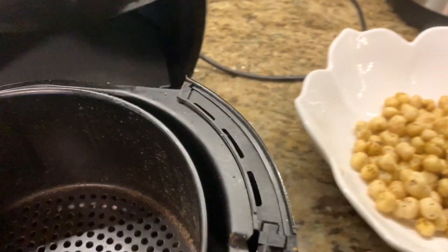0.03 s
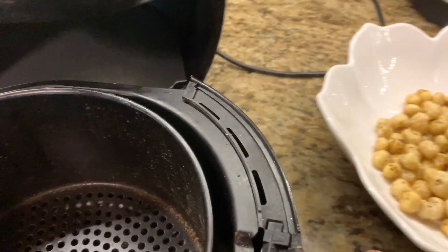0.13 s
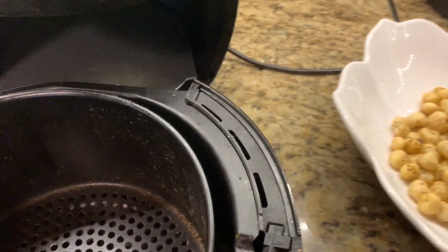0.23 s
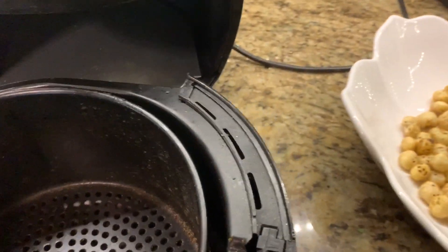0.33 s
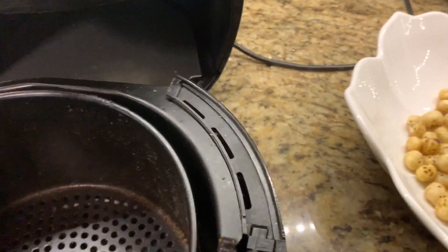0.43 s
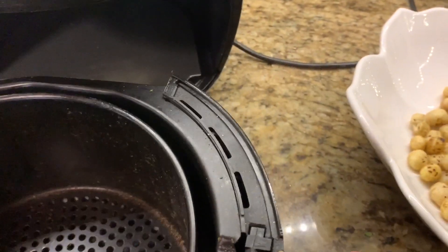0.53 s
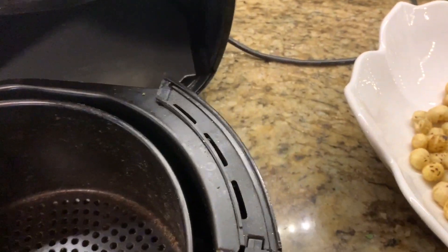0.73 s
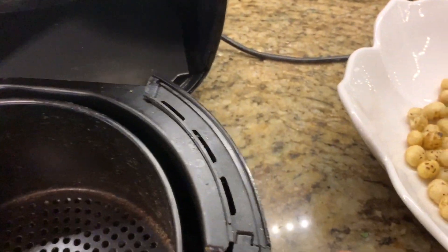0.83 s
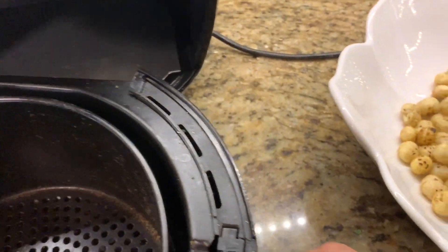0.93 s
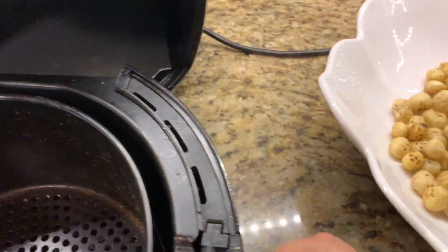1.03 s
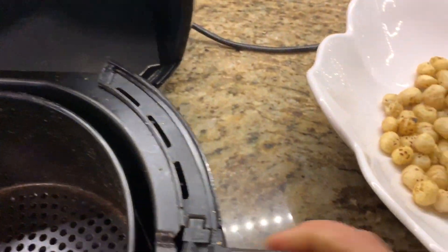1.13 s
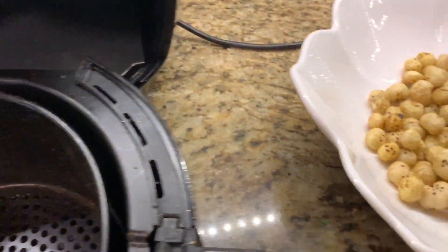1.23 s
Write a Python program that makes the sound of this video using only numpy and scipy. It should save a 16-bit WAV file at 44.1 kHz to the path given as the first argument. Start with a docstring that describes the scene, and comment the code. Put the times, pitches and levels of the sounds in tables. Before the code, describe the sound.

Two quick, hollow knocks with a metallic rattle sound as an air fryer drawer meets a kitchen counter. Light rubbing, bumps and tiny clicks come after, with soft clockwork ticking, a steady low hum and a little room echo.

```python
"""A low hum fills a small kitchen, and an air fryer's clockwork timer ticks softly throughout.
The fryer's plastic drawer is knocked twice on the stone counter: the hollow drawer booms, and the
metal basket inside rattles briefly each time. The drawer then slides a little with a faint hiss,
and light scuffs, dull bumps, two tiny clicks and a shorter slide follow as it is handled. All but the
hum echo in the room; knocks, rattles, slides, bumps and ticks reach the left just before the right."""
import sys
import numpy as np
from scipy import signal
from scipy.fft import irfft, next_fast_len
from scipy.io import wavfile
from scipy.ndimage import map_coordinates

SR = 44100
rng = np.random.default_rng(int(sys.argv[2]) if len(sys.argv) > 2 else 0)


def bounce(signal):
    """Save signal as a 16-bit WAV file at the path given by the first command-line argument."""
    frames = np.transpose(np.atleast_2d(signal))
    limited = np.clip(frames, -1, 1)
    pcm = np.round(limited * 32767).astype(np.int16)
    wavfile.write(sys.argv[1], SR, pcm)


N = 57330
RIGHT_LAG_S, DRAWER_PAN_DB, BASKET_PAN_DB = .00027, 3, -0.5
CONTACT_SPREAD, CLACK_RISE_S = 0.86, 0.00057


def gain(db):
    """Turn decibels into a number to multiply by."""
    return 10 ** (np.asarray(db) / 20)


def noise(colour, spread=0.6):
    """Stereo noise shaped by (pitch_hz, level_db) rows; at spread 0 the sides match, at 1 they don't."""
    hz, db = np.array(colour).T
    size = next_fast_len(N)
    bins_hz = np.fft.rfftfreq(size, 1 / SR)
    strength = gain(np.interp(np.log(bins_hz + 1), np.log(hz), db))
    phases = np.exp(2j * np.pi * rng.random((2, len(strength))))
    mid, side = irfft(strength * phases, size)[:, :N]
    pair = np.array([mid + spread * side, mid - spread * side])
    return pair / pair.std()


def fade(start, rise, decay):
    """Loudness that swells, then dies away by 60 dB every `decay` seconds."""
    age = np.maximum(np.arange(N) / SR - start, 0)
    return (1 - np.exp(-age / rise)) * np.exp(-np.log(1000) * age / decay)


def ring(tones, start, rise, pitch_ratio):
    """One blow sets off fading tones, each with its pitch multiplied by pitch_ratio."""
    age = np.arange(N) / SR - start
    return -sum(gain(db) * fade(start, rise, decay) * np.sin(2 * np.pi * hz * pitch_ratio * age)
                for hz, db, decay in tones)


def wander(rate_hz):
    """A smooth random drift, mostly between -1 and 1."""
    points = rng.standard_normal(2048)
    return map_coordinates(points, [np.arange(N) / SR * rate_hz], mode="mirror")


def place(sound, pan_db, lag_s=RIGHT_LAG_S):
    """Make the left side louder by pan_db and the right side later by lag_s."""
    left, right = np.broadcast_to(sound, (2, N))
    late_right = np.pad(right, (round(lag_s * SR), 0))[:N]
    return np.array([left * gain(pan_db / 2), late_right * gain(-pan_db / 2)])


# colour of the rumble: pitch_hz, level_db
RUMBLE_COLOUR = [(8, -62), (22, -29), (34, -10), (55, 4), (80, -3.5), (140, -5), (200, -17.5), (300, -20.5),
                 (450, -26), (700, -36.5), (1100, -42.5), (2000, -52), (4000, -48), (16000, -66)]


def hum():
    """An appliance's low rumble, a 60 Hz tone from the power line and a trace of hiss."""
    rumble = gain(-48.5) * noise(RUMBLE_COLOUR, spread=.25)
    mains = gain(-50.5) * np.sqrt(2) * np.sin(2 * np.pi * 60 * np.arange(N) / SR)
    hiss = gain(-84) * noise([(300, -28), (4000, -2), (15000, -25.5)])
    return rumble + mains + hiss


# colour of the room's echo: pitch_hz, level_db
ECHO_COLOUR = [(100, -8.5), (250, -1.5), (450, -1), (1000, 0.5), (2500, -8.5), (7000, -4), (14000, 0.5)]


def kitchen_echo(sound):
    """The hard walls of a small room blur each sound into a fading tail."""
    tail = noise(ECHO_COLOUR) * fade(0, rise=0.0044, decay=0.73)
    tail = tail / np.sqrt(np.sum(tail ** 2) / 2)
    return gain(-14.5) * signal.fftconvolve(sound, tail, axes=1)[:, :N]


# slides of the drawer: start_s, length_s, level_db
SLIDE_MOVES = [(0.449, 0.13, -60), (1.03, 0.043, -67)]
# colour of their hiss: pitch_hz, level_db
SLIDE_COLOUR = [(700, 0), (1600, 0), (2300, -5), (4200, 0), (5300, -5), (7600, -2), (9800, -14),
                (11300, -10), (13500, -12), (15000, -28)]


def slide():
    """The drawer rubs over the counter with a faint, grainy hiss."""
    t = np.arange(N) / SR
    edge_s = .012
    motion = sum(gain(db) * np.clip(np.minimum(t - start, start + length - t) / edge_s + .5, 0, 1)
                 for start, length, db in SLIDE_MOVES)
    grain = gain(2 * wander(rate_hz=400))
    return place(motion * grain * noise(SLIDE_COLOUR, CONTACT_SPREAD), BASKET_PAN_DB)


# colour of a snap: pitch_hz, level_db
SNAP_COLOUR = [(1000, 1), (4000, -1.5), (8000, -4), (11000, -6), (15000, -8.5), (16000, -23)]


def snap(loudness):
    """The bright noise of a sharp contact, used for plastic clicks and basket clacks."""
    return loudness * noise(SNAP_COLOUR, CONTACT_SPREAD)


# light touches: start_s, level_db, rise_s, decay_s
SCUFF_TOUCHES = [(0.155, -54.5, 0.00051, 0.33), (0.58, -43.5, 0.0097, 0.059), (0.605, -62, 0.00044, 0.073),
                 (0.663, -52, 0.0019, 0.083), (0.754, -57.5, 0.00076, 0.087), (0.773, -60.5, 0.0008, 0.043),
                 (1.029, -57.5, 0.0025, 0.34), (1.057, -53, 0.011, 0.078)]
# their colour: pitch_hz, level_db
SCUFF_COLOUR = [(200, 2), (700, 10), (1100, 3), (1600, 3), (2600, -2), (4500, -1.5), (7000, -18),
                (14000, -19)]
# tiny clicks of plastic: start_s, level_db
PLASTIC_CLICKS = [(0.7535, -71), (1.0105, -56)]
# dull bumps: start_s, level_db, pitch_ratio
BUMP_HITS = [(0.643, -33, 1.0), (0.757, -48.5, 1.9), (1.067, -55, 3.4)]
# tones of a bump: base_pitch_hz, level_db, decay_s
BUMP_TONES = [(68.9, 0, 0.18), (152.4, -3.5, 0.17), (212.3, 3.5, 0.081), (256.9, -4, 0.15)]


def handling():
    """Handling the drawer makes faint scuffs, clicks of plastic and soft, dull bumps."""
    touches = sum(gain(db) * fade(start, rise, decay) for start, db, rise, decay in SCUFF_TOUCHES)
    scuffs = touches * noise(SCUFF_COLOUR, CONTACT_SPREAD)
    clicks = snap(sum(gain(db) * fade(start, CLACK_RISE_S, decay=0.02) for start, db in PLASTIC_CLICKS))
    bumps = sum(gain(db) * ring(BUMP_TONES, start, rise=0.0021, pitch_ratio=ratio)
                for start, db, ratio in BUMP_HITS)
    return scuffs + clicks + place(bumps, DRAWER_PAN_DB)


# ticks of the timer: start_s, level_db, pan_db, pitch_ratio
TIMER_TICKS = [(-0.002, -2.5, -0.5, 0.97), (0.4375, 1, 1, 0.94), (0.6597, -5, 1, 1.04),
               (0.8798, -1, 0.5, 0.98), (1.1015, -5.5, 0.5, 1.03)]
# colour of a tick: pitch_hz, level_db
TICK_COLOUR = [(600, -2.5), (2200, -11.5), (3000, 3.5), (3700, 3.5), (5400, -9), (6800, -2), (8300, -8.5),
               (10000, -3), (12000, -15.5), (14200, 0.5), (16000, -27)]
# tones of the clockwork: base_pitch_hz, level_db, decay_s
CLOCKWORK_TONES = [(2850, -58, .04), (3400, -53, .06), (3660, -44, .06), (4560, -54, .07), (5250, -57, .05),
                   (6500, -58, .07), (9600, -55, .045)]
# lingering tone of the spring: base_pitch_hz, level_db, decay_s
SPRING_TONE = [(3790, -68, .7)]


def timer():
    """The catch that paces the clockwork clicks, and the gears, case and spring ring briefly."""
    rise = 0.0017
    ticks = 0
    for start, db, pan_db, ratio in TIMER_TICKS:
        click = gain(-40) * fade(start, rise, decay=0.021)
        case = gain(-49.5) * fade(start, rise, decay=0.13)
        burst = (click + case) * noise(TICK_COLOUR, spread=0.87)
        gears = ring(CLOCKWORK_TONES, start, rise, ratio)
        spring = ring(SPRING_TONE, start, rise, pitch_ratio=0.98)
        ticks = ticks + gain(db) * place(burst + gears + spring, pan_db)
    return ticks


# the basket hits the drawer: start_s, ring_db, crack_db, snap_db
BASKET_CLACKS = [(0.218, -20, 5.5, 0), (0.2222, 1, -2, -7), (0.2275, -3, -2.5, -9), (0.240, 2.5, -10, -15),
                 (0.2425, -5.5, 1, -2.5), (0.2485, -26, -18, -11), (0.3352, -35, 1, -7.5),
                 (0.3364, -3, 0.5, -26), (0.3585, -3, -10, -24), (0.3655, -18, -7.5, -18),
                 (0.375, -36, -12.5, -31)]
# tones of the metal basket: pitch_hz, level_db, decay_s
BASKET_TONES = [(1035, -40, .18), (1085, -40, .16), (1373, -52, .55), (1681, -29, .18), (1730, -32, .22),
                (1829, -31, .2), (1948, -28, .12), (2532, -37, .24), (2574, -32, .22), (3325, -42, .16),
                (3410, -42, .14), (3830, -40, .14), (4163, -43, .18), (4456, -44, .15), (4848, -43, .13),
                (5520, -49, .15), (6010, -53, .24), (7330, -47, .12), (7850, -57, .3)]
# colour of a clack's crack: pitch_hz, level_db
CRACK_COLOUR = [(300, 8), (800, 13.5), (1400, -3), (1900, 9), (2900, -12.5), (3400, 8.5), (4800, -6),
                (6000, -8), (7400, -2), (9000, -22.5), (10000, -5.5), (11000, -44), (13500, -21),
                (16000, -46)]


def basket():
    """The basket rattles in its drawer: each clack snaps, cracks and leaves thin metal ringing."""
    starts, ring_db, crack_db, snap_db = np.array(BASKET_CLACKS).T

    def loudness(levels_db, decay):
        """Add up the fading energy of all the clacks."""
        return np.sqrt(sum((gain(db) * fade(start, CLACK_RISE_S, decay)) ** 2
                           for start, db in zip(starts, levels_db)))

    t = np.arange(N) / SR
    metal = 0
    for hz, db, decay in BASKET_TONES:
        wavering_tone = np.sin(2 * np.pi * hz * t + .7 * wander(rate_hz=70))
        metal = metal + gain(db) * loudness(ring_db, decay) * wavering_tone
    cracks = gain(-28) * loudness(crack_db, decay=0.11) * noise(CRACK_COLOUR, CONTACT_SPREAD)
    snaps = snap(gain(-30.5) * loudness(snap_db, decay=0.024))
    return place(metal + cracks + snaps, BASKET_PAN_DB, lag_s=.00022)


# the drawer hits the counter, twice per knock: start_s, level_db, pitch_ratio
DRAWER_HITS = [(0.2215, -1.7, 1.0), (0.2439, -20, 0.988), (0.3385, -6.1, 0.976), (0.3685, -13.2, 0.981)]
# tones of the plastic drawer: base_pitch_hz, level_db, decay_s
DRAWER_TONES = [(93, -21.0, 0.225), (141, -33.8, 0.575), (202, -12.4, 0.063), (254, -4.2, 0.182),
                (245, -17.0, 0.443), (291, -28.7, 0.039), (349, -14.9, 0.101), (385, -11.7, 0.131),
                (431, -4.7, 0.051), (471, -17.9, 0.172), (571, -22.8, 0.085), (703, -20.2, 0.057),
                (788, -34.7, 0.353), (896, -31.6, 0.108)]


def drawer():
    """The hollow drawer booms each time it meets the stone counter."""
    booms = sum(gain(db) * ring(DRAWER_TONES, start, rise=.002, pitch_ratio=ratio)
                for start, db, ratio in DRAWER_HITS)
    return place(booms, DRAWER_PAN_DB)


def scene():
    """The fryer's sounds and their echo, over the hum."""
    fryer = drawer() + basket() + slide() + timer() + handling()
    return fryer + kitchen_echo(fryer) + hum()


def record(dry):
    """Trim away the deepest bass and the highest treble."""
    bass_cut = signal.butter(1, 20, "high", fs=SR, output="sos")
    treble_cut = signal.ellip(8, .2, 70, 15500, fs=SR, output="sos")
    return signal.sosfilt(treble_cut, signal.sosfilt(bass_cut, dry))


dry = scene()
out = record(dry)
bounce(out)
```